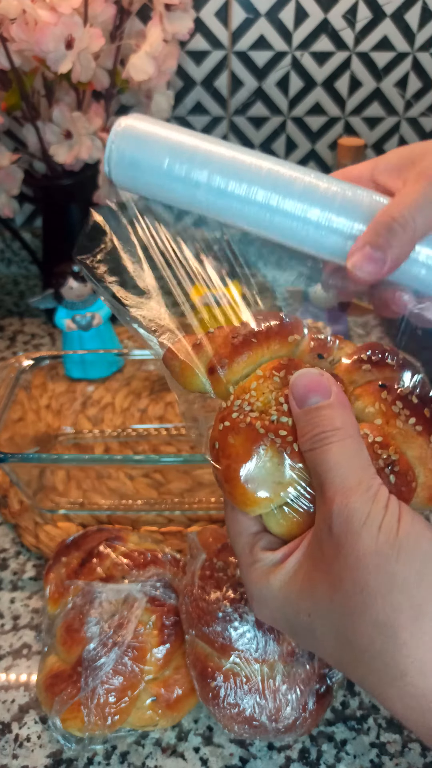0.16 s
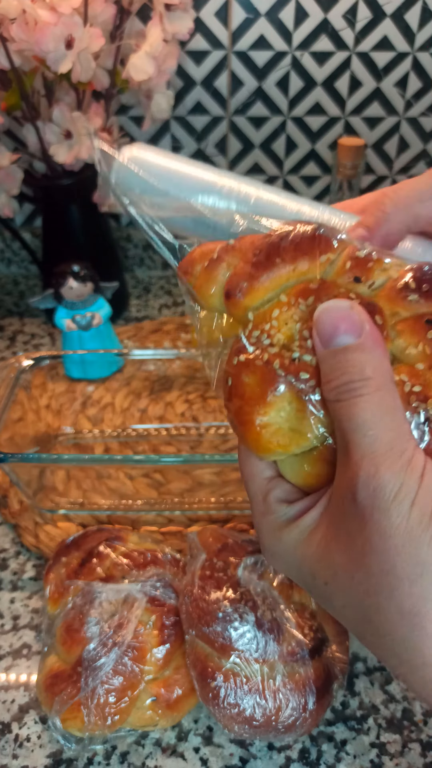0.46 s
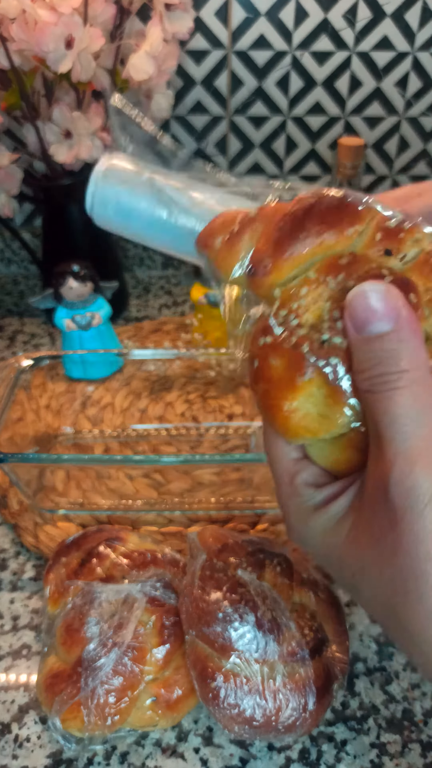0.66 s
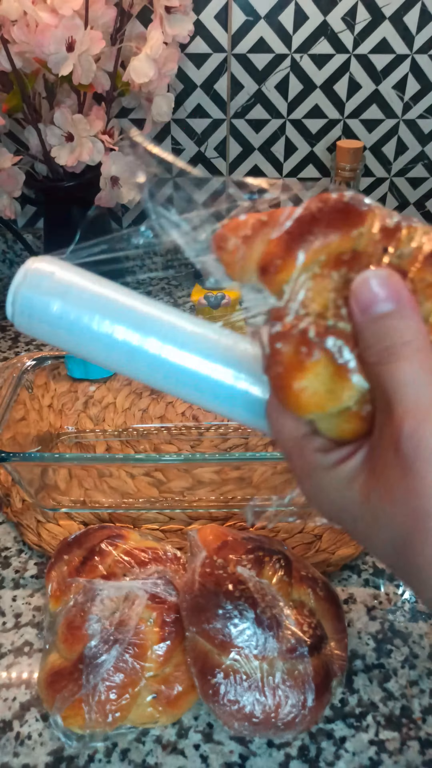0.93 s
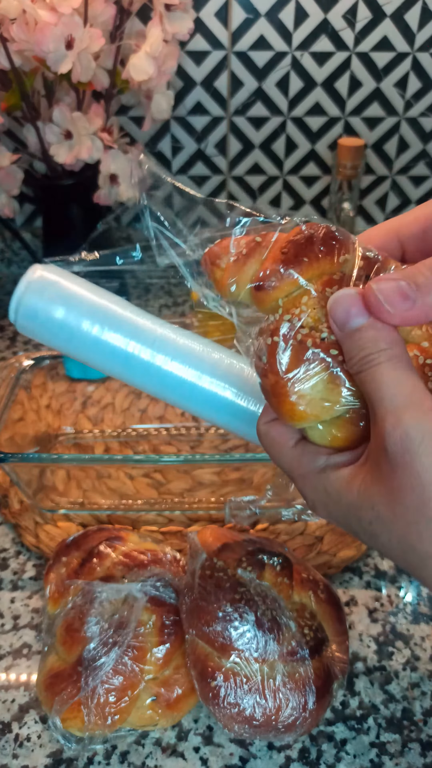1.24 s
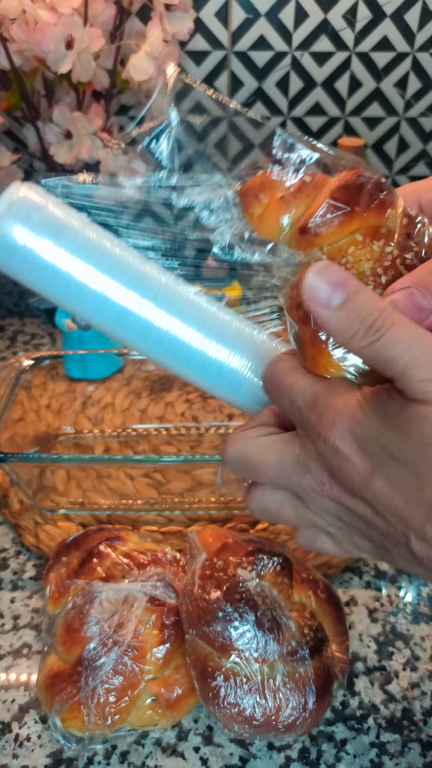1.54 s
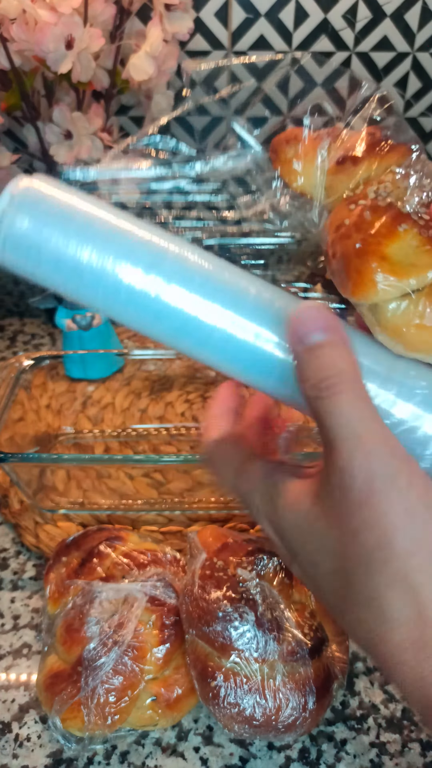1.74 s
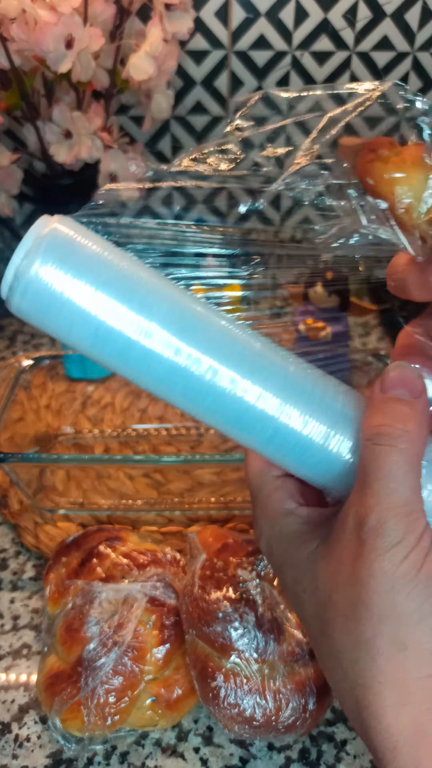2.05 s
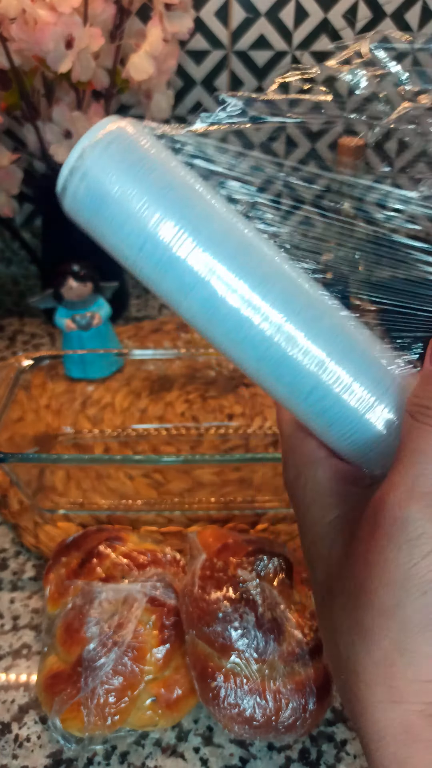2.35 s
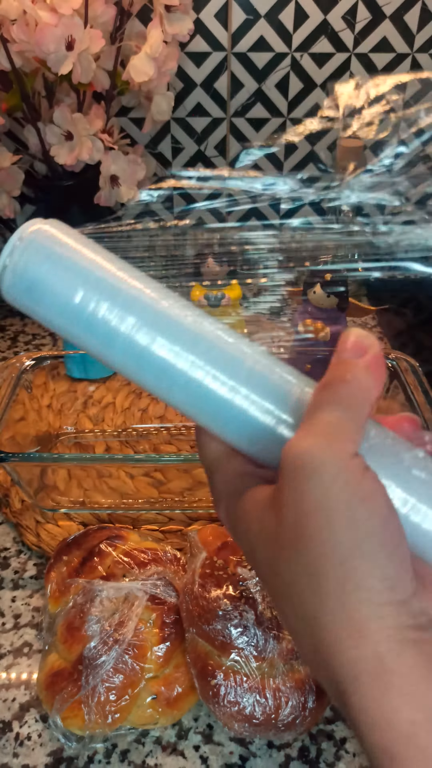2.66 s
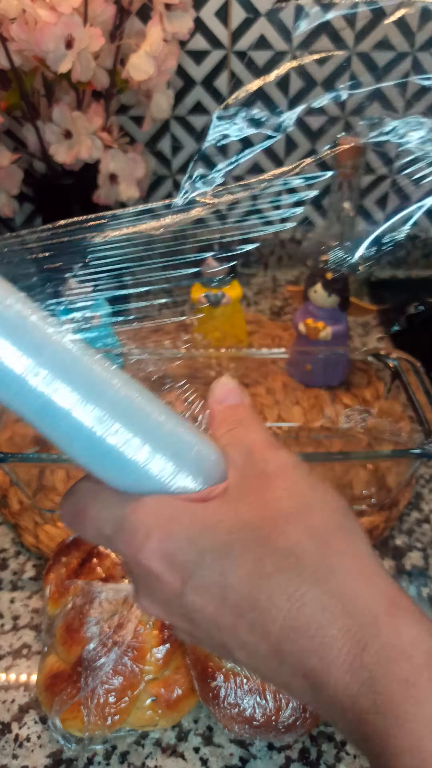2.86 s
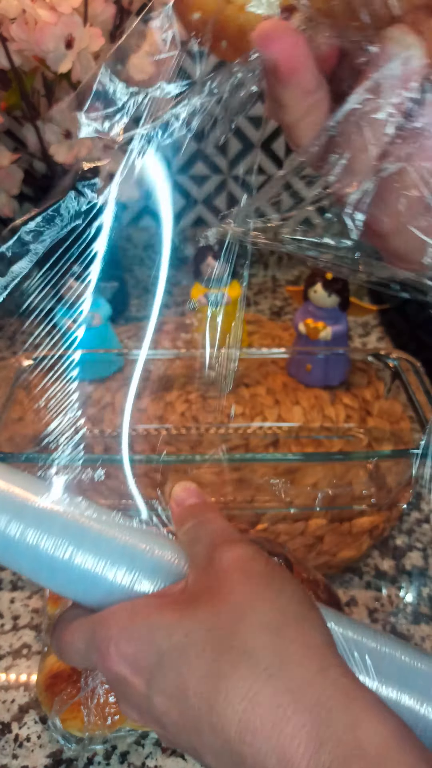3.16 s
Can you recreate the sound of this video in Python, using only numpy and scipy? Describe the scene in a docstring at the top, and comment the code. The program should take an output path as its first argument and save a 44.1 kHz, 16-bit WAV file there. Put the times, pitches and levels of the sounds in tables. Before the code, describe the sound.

Cling film is tugged from a roll close to the microphone: strong rasps early, faint crinkles and a tiny squeak in the middle, then a dense burst of crackles and snaps in a small, reverberant kitchen.

```python
"""A short rasp of cling film fades first; more tugs follow as film leaves its roll and is wound round a loaf.
The film peels in tiny slips, from a slow rattle to a fast rasp; each slip cracks, rings the taut sheet
and drums on the roll. Slack film crinkles in random ticks, over the hush of a small kitchen.
Stuck folds let go with single snaps, sliding film squeaks, and the roll knocks when the film catches.
Echoes made from fading noise, plus a few ringing low notes, give the close tiled room."""
import sys
import numpy as np
from scipy import signal
from scipy.fft import rfft, irfft, next_fast_len
from scipy.io import wavfile
from scipy.ndimage import uniform_filter1d, minimum_filter1d

SR = 44100
rng = np.random.default_rng(int(sys.argv[2]) if len(sys.argv) > 2 else 0)


def master_out(mix):
    """Clip the mix to full scale and print it as 16-bit PCM to the path in sys.argv[1]."""
    frames = np.transpose(np.atleast_2d(mix))
    ceiling = np.clip(frames, -1, 1)
    pcm = np.round(ceiling * 32767).astype(np.int16)
    wavfile.write(sys.argv[1], SR, pcm)


N = 145530

# Tone of a full crack: pitch_hz [Hz], level_db [dB]
CRACK_TONE = [(100, -47.5), (400, -24.5), (1500, -10), (3000, -11.5), (4300, -1.5), (5500, -2), (7000, 2.5),
              (8300, -5.5), (12000, -8.5), (15500, -16.5)]
# Tone of the middle-pitched rasp: pitch_hz [Hz], level_db [dB]
RASP_TONE = [(100, -37.5), (300, -3.5), (520, 2), (800, 6), (2300, 7.5), (3600, -2), (6000, -3.5),
             (15000, -14)]
# Tone of the drumming roll: pitch_hz [Hz], level_db [dB]
ROLL_TONE = [(30, -44), (90, -15), (160, -2.5), (235, -4), (320, -1.5), (500, -7), (1200, -3.5),
             (5000, -64)]
# Tone of thin ticks, from slack film and small snaps: pitch_hz [Hz], level_db [dB]
TICK_TONE = [(150, -33), (500, -10), (1500, -5.5), (3000, -5), (4400, -3), (5500, -1.5), (7200, 2),
             (8400, -1), (12000, -5.5), (15500, -5)]


def amp(db):
    """Turn decibels into a multiplier."""
    return 10 ** (np.asarray(db) / 20)


def unit(x):
    """Scale to an average (rms) level of 1."""
    return x / np.sqrt(np.mean(x ** 2) + 1e-20)


def along(points, hz):
    """Read between (Hz, value) points, with pitch spaced as the ear hears it (log scale)."""
    point_hz, values = np.transpose(points)
    return np.interp(np.log(hz + 1), np.log(point_hz + 1), values)


def coloured(x, points, keep_power=True):
    """Give a sound the tone drawn by (Hz, dB) points, without smearing it ahead of its start."""
    m = 2 * next_fast_len(N)
    gain = amp(along(points, np.fft.rfftfreq(m, 1 / SR)))
    if keep_power:
        gain = unit(gain)
    # Folding the cepstrum forward gives a minimum-phase filter, which reacts at once.
    cepstrum = irfft(np.log(gain))
    cepstrum[1:m // 2] *= 2
    cepstrum[m // 2 + 1:] = 0
    return irfft(rfft(x, m) * np.exp(rfft(cepstrum)))[:N]


def cracks(times, sizes, decay_s, fuzz):
    """Each sudden release is a sharp step with a short noisy tail; its energy goes as size squared."""
    at = np.round(np.asarray(times) * SR).astype(int)
    inside = (at >= 0) & (at < N)
    spikes = np.bincount(at[inside], sizes[inside], N)
    keep = np.exp(-2 / (decay_s * SR))  # energy kept from one sample to the next
    energy = signal.lfilter([1 - keep], [1, -keep], spikes ** 2 + 1e-20)
    tail = np.sqrt(energy) * rng.standard_normal(N)
    return (spikes + fuzz * tail) / np.hypot(1, fuzz)


def sheet(x, pitch_hz):
    """Taut film rings in several modes, gliding with its free length and wandering with its tension."""
    # Sheet modes: pitch_ratio [times the base pitch], level_db [dB]
    mode_list = [(1.002, 1.5), (1.45, -7.5), (2.05, -3), (2.8, -3.5)]
    width_hz, wander_share = 39, 0.046  # width of each mode; wander as a share of the pitch
    knots = rng.standard_normal(40)
    wander = np.interp(np.arange(len(x)) / SR * 80, np.arange(len(knots)), knots)  # 80 knots a second
    phase = 2 * np.pi * np.cumsum(pitch_hz * (1 + wander_share * wander)) / SR
    keep = np.exp(-np.pi * width_hz / SR)
    out = np.zeros(len(x))
    for ratio, db in mode_list:
        turn = np.exp(1j * ratio * phase)
        ringing = turn * signal.lfilter([1], [1, -keep], x / turn)
        out += amp(db) * ringing.imag
    # The ringing gets the same energy as the slips that drive it.
    return out * np.linalg.norm(x) / (np.linalg.norm(out) + 1e-12)


def peeling():
    """Film sticks and slips off the roll; every slip cracks, rasps, rings the sheet and drums on the roll."""
    # Tugs: start_s [s], end_s [s], first_level_db, last_level_db [dB before tone shaping],
    # first_rate, last_rate [slips per s], uneven [0-1], first_pitch_hz, last_pitch_hz [sheet base pitch, Hz],
    # ring_db, rasp_db, roll_db [dB relative to the slips]
    tugs = [(-.03, 0.029, -36.5, -46, 580, 403, 0.12, 790, 661, -5, -5, -3),
            (.14, 0.212, -60.5, -32, 513, 458, 0.09, 1155, 703, -7.5, -7, -12.5),
            (0.208, .245, -25.5, -21.5, 600, 665, 0.17, 580, 565, -17, -7, -28),
            (0.248, 0.299, -24.5, -21.5, 860, 800, .5, 890, 816, -10.5, -7.5, -21),
            (0.3, .318, -35, -23.5, 630, 730, 0.5, 780, 785, -13, -0.5, -22),
            (0.321, .356, -15, -28.5, 805, 628, 0.48, 618, 574, -11, -4.5, -40),
            (0.571, 0.617, -42.5, -41.5, 440, 650, 0.4, 542, 476, -9, -6, -12),
            (0.613, 0.638, -40, -33, 755, 700, 0.35, 694, 734, -12, -0.5, -26),
            (0.647, 0.674, -38, -36, 520, 460, .35, 737, 719, -4, -1, -9),
            (.925, 0.976, -54, -40, 860, 610, 0.32, 1790, 1560, -24, -30, -21),
            (1.016, 1.04, -52, -44.5, 730, 700, .5, 710, 694, -16, -9.5, -10),
            (1.212, 1.255, -49.5, -49.5, 395, 420, 0.99, 530, 493, -19, -7, -7.5),
            (1.945, 2, -44.5, -61.5, 690, 630, 0.46, 810, 810, -11, -3, -6.5),
            (1.999, 2.035, -24.5, -23.5, 650, 650, 0.68, 790, 810, -20, -1, -12),
            (2.039, 2.088, -32.5, -35.5, 630, 482, .5, 235, 238, -6.5, 0.5, -8.5),
            (2.291, 2.38, -47.5, -49.5, 720, 760, 0.69, 910, 910, -22, -14, -17),
            (2.424, 2.452, -55, -52, 540, 550, 0.66, 700, 604, -8.5, -7, -8),
            (2.546, 2.587, -28, -31, 590, 470, .45, 920, 1030, -37, -4.5, -11),
            (2.594, 2.624, -40, -37, 570, 550, .5, 730, 708, -11, -5.5, -12),
            (2.644, 2.745, -34.5, -38.5, 543, 500, 0.48, 474, 422, -15, -6.5, -7.5),
            (2.785, 2.824, -31.5, -34.5, 483, 500, 0.65, 230, 232, -3.5, -10, -5),
            (2.806, 2.853, -24, -25.5, 557, 360, 0.17, 529, 746, -6, -14.5, -29),
            (2.861, 2.886, -33, -33.5, 350, 410, .6, 713, 662, -5, -2, -10.5),
            (2.924, 2.972, -25.5, -28, 376, 280, 0.15, 642, 715, -11.5, -11.5, -16),
            (2.971, 2.996, -37.5, -49, 304, 184, 0.76, 680, 634, -19, 5.5, 4),
            (3.18, 3.226, -39.5, -45.5, 424, 413, 0.7, 414, 418, -16, -7.5, -8)]
    attack_s, release_s = 0.0026, 0.0046
    size_spread_db = 7.5  # scaled by each tug's unevenness
    slip_decay_s, slip_fuzz = 0.0009, 1.31  # tail length; tail strength before unevenness scales it
    t = np.arange(N) / SR
    crack, rasp, drum, ring = np.zeros((4, N))
    for start, end, db0, db1, rate0, rate1, uneven, hz0, hz1, ring_db, rasp_db, roll_db in tugs:
        span = [start, end]
        chance = rng.standard_normal((200, 2))
        # Count slips along the tug, then push each one early or late by chance.
        slip_count = np.cumsum(np.interp(t, span, [rate0, rate1]) * (t >= start)) / SR
        marks = np.arange(len(chance)) + .5 + .5 * uneven * chance[:, 0]
        times = np.interp(np.abs(marks) + 1e-6, slip_count, t)

        rise = np.clip((times - start) / attack_s, 0, 1)
        fall = np.exp(-np.maximum(times - end, 0) / release_s)
        shape = rise * fall
        scatter = amp(size_spread_db * uneven * np.clip(chance[:, 1], -2, 2))
        # Uneven sizes must not change the tug's overall energy.
        scatter /= np.sqrt(np.sum((scatter * shape) ** 2) / (np.sum(shape ** 2) + 1e-12)) + 1e-12
        level = amp(np.interp(times, span, [db0, db1]))
        rate = np.interp(times, span, [rate0, rate1])
        sizes = scatter * shape * level * np.sqrt(SR / rate)  # fewer slips are each larger

        slips = cracks(times, sizes, slip_decay_s, slip_fuzz * np.sqrt(abs(uneven)))
        slips -= uniform_filter1d(slips, size=400)  # take out slow drift
        crack += slips
        rasp += amp(rasp_db) * slips
        drum += amp(roll_db) * slips
        live = (t >= start) & (t < end + .1)
        ring[live] += amp(ring_db) * sheet(slips[live], np.interp(t[live], span, [hz0, hz1]))
    late_rasp = np.roll(rasp, 9)  # about 0.2 ms after the crack
    return coloured(crack, CRACK_TONE) + coloured(late_rasp, RASP_TONE) + coloured(drum, ROLL_TONE) + ring


def crinkle():
    """Slack film creases under the fingers in faint, bright random ticks."""
    # Crinkle loudness: time_s [s], level_db [dB before tone shaping]
    loudness = [(0, -67), (.55, -66), (.8, -64), (.9, -59), (1.1, -60), (1.18, -50), (1.36, -56),
                (1.47, -59), (1.68, -54.5), (1.8, -66), (1.95, -50.5), (2.22, -51), (2.35, -58),
                (2.5, -53.5), (3.1, -51.5), (3.3, -46)]
    ticks_per_s, spread_db = 800, 4
    chance = rng.random((int(ticks_per_s * N / SR), 2))
    times = chance[:, 0] * N / SR
    scatter = unit(amp(spread_db * np.minimum(-np.log(chance[:, 1]), 3.5)))  # mostly small, a few large
    sizes = scatter * np.sqrt(SR / ticks_per_s)
    level = amp(np.interp(times, *np.transpose(loudness)))
    return coloured(cracks(times, sizes * level, decay_s=.0018, fuzz=3), TICK_TONE)


def hush():
    """Steady noise, strongest in the bass, stands for the quiet kitchen."""
    # Tone of the hush: pitch_hz [Hz], level_db [dB]
    hush_tone = [(20, -42), (50, -18), (82, 6.5), (120, -3.5), (230, -1.5), (340, -6), (500, -6),
                 (900, -16), (2500, -27), (7000, -27), (16000, -47.5)]
    return amp(-57.5) * coloured(rng.standard_normal(N), hush_tone)


def kitchen(x):
    """Quick early echoes and a short tail from fading noise; crossfading patterns avoid a steady comb."""
    # Time for the tail to fade by 60 dB: pitch_hz [Hz], fade_s [s]
    fade_times = [(150, 0.42), (450, 0.46), (1000, 0.36), (3000, 0.31), (7000, 0.22), (15000, 0.11)]
    # Tone of all echoes: pitch_hz [Hz], level_db [dB]
    echo_tone = [(100, -0.5), (600, 0.5), (2500, -2.5), (7000, 1.5), (15000, 4)]
    tail_db, early_db, early_decay_s = -10.5, -8, 0.0028  # levels before the echo tone
    t, out = np.arange(N) / SR, np.zeros(N)
    places = np.linspace(0, N / SR, num=21)  # times at which a new echo pattern is strongest
    for place in places:
        hz, age, z = signal.stft(rng.standard_normal(SR // 2), SR, nperseg=256)
        fading = np.exp(-np.log(1000) * age / along(fade_times, hz)[:, None])
        tail = signal.istft(z * fading, SR, nperseg=256)[1]
        lag = np.arange(len(tail)) / SR
        tail = tail * np.minimum(lag / 0.018, 1)  # the tail builds up over 18 ms
        early = rng.standard_normal(len(lag)) * np.exp(-lag / early_decay_s) * (lag > .001)
        answer = amp(tail_db) * tail / np.linalg.norm(tail)
        answer += amp(early_db) * early / np.linalg.norm(early)
        # Neighbouring echo patterns crossfade.
        share = np.sqrt(np.maximum(1 - np.abs(t - place) / places[1], 0))
        out += signal.fftconvolve(x * share, answer)[:N]
    return coloured(out, echo_tone, keep_power=False)


def standing_waves(x):
    """A few low notes hang on between the tiled walls, each from a narrow resonant filter."""
    # Room notes: pitch_hz [Hz], width_hz [Hz], level_db [dB]
    room_notes = [(234.2, 6.1, -4.5), (274, 10, -2.5), (540, 18, 3.5)]
    return sum(amp(db) * signal.lfilter(*signal.iirpeak(hz, hz / width, SR), x)
               for hz, width, db in room_notes)


def snaps():
    """Single stuck folds tear free; the small ones sound thinner and brighter."""
    # Snaps: time_s [s], level_db [dB before the boost and tone shaping]
    snap_list = [(0.813, -37), (1.2171, -27), (1.3876, -25), (1.6813, -34), (1.71, -33.5), (1.9956, -11),
                 (1.998, -16), (2.006, -18), (2.013, -27), (2.0365, -15), (2.043, -10.5), (2.0586, -12),
                 (2.068, -16), (2.0832, -16.5), (2.098, -8.5), (2.1948, -26), (2.277, -24.5),
                 (2.294, -20.5), (2.3096, -16.5), (2.321, -24), (2.343, -24), (2.345, -18.5),
                 (2.361, -19.5), (2.422, -25), (2.429, -25.5), (2.438, -20), (2.444, -22), (2.472, -28.5),
                 (2.501, -54), (2.5398, -17), (2.555, -7), (2.568, -15), (2.58, -15), (2.632, -8),
                 (2.6425, -22), (2.651, -13.5), (2.669, -13), (2.691, -17.5), (2.7007, -12.5),
                 (2.73, -13.5), (2.739, -24), (2.765, -7), (2.7865, -13.5), (2.808, -12), (2.87, -12),
                 (2.9811, -18), (2.9903, -12.5), (3.0093, -16), (3.0215, -12), (3.186, -26)]
    boost_db, decay_s, fuzz = 7.5, 0.0011, 2.66  # added level; tail length; tail strength
    small_db, big_db = -27.5, -12.5  # table levels: a thin tick below the first, a full crack above the second
    times, db = np.transpose(snap_list)
    big = np.clip((db - small_db) / (big_db - small_db), 0, 1)
    sizes = amp(db + boost_db)
    full = cracks(times, sizes * np.sqrt(big), decay_s, fuzz)
    thin = cracks(times, sizes * np.sqrt(1 - big), decay_s, fuzz)
    out = coloured(full, CRACK_TONE)
    out += amp(-8.5) * coloured(full, RASP_TONE)
    out += amp(-11) * coloured(full, ROLL_TONE)
    return out + coloured(thin, TICK_TONE)


def squeak():
    """Film sliding on film slips fast enough to give a short, rough, dipping note."""
    # Squeak path: time_s [s], pitch_hz [base pitch before wavering, Hz], level_db [dB]
    path = [(.925, 2156, -70), (.94, 1771, -52), (0.956, 1557, -53), (0.966, 1534, -44.5),
            (.974, 1660, -43.5), (.982, 1880, -72)]
    # Overtones: multiple [times the base pitch], level_db [dB relative to each other]
    overtones = [(1, -6), (2, -8), (3, -3), (4, 1), (5, 5.5)]
    waver_share = .025  # share of the pitch
    t = np.arange(N) / SR
    times, hz, db = np.transpose(path)
    waver = unit(uniform_filter1d(rng.standard_normal(N), size=40))
    phase = 2 * np.pi * np.cumsum(np.interp(t, times, hz) * (1 + waver_share * waver)) / SR
    note = sum(amp(level) * np.sin(round(k) * phase) for k, level in overtones)
    sounding = (t > times[0]) * (t < times[-1])
    return unit(note) * amp(np.interp(t, times, db)) * sounding


def jerks():
    """The cardboard roll gives a hollow knock of fading notes when the film catches."""
    # Knocks: time_s [s], level_db [dB before each note's own level]
    knocks = [(2.1, -28), (2.555, -33.5), (2.767, -23.5), (3.19, -39)]
    # Notes of the roll: pitch_hz [Hz], level_db [dB], fade_s [s to fade by 60 dB]
    roll_notes = [(162, -17, 0.026), (242.6, -4, 0.085), (410, -7, 0.023), (744, -0.5, 0.018)]
    t, out = np.arange(N) / SR, np.zeros(N)
    for start, knock_db in knocks:
        age = np.maximum(t - start, 0)
        for hz, db, fade_s in roll_notes:
            fading = np.exp(-np.log(1000) * age / fade_s)
            out += amp(knock_db + db) * fading * np.sin(2 * np.pi * hz * age)
    return out


def scene():
    """Add film and roll, their room sound and the kitchen's hush."""
    film = peeling() + snaps() + jerks() + squeak() + crinkle()
    room = kitchen(film) + standing_waves(film)
    return (film + room + hush())[None]


def record(dry):
    """Cut the low bass, shape two dips in the treble, round the peaks and remove the very top."""
    # Treble dips: pitch_hz [Hz], level_db [dB]
    treble_dips = [(4650, 0), (4850, -7), (6000, -7), (6250, 0), (8450, 0), (8650, -16), (10500, -23),
                   (11450, -20), (11680, 0)]
    low_cut_hz, top_hz, ceiling_db = 91, 15850, -12
    m = 2 * next_fast_len(N)
    hz = np.fft.rfftfreq(m, 1 / SR)
    x = signal.sosfilt(signal.butter(2, low_cut_hz, "high", fs=SR, output="sos"), dry)
    x = irfft(rfft(x, m) * amp(along(treble_dips, hz)), m)[:, :N]
    # Turn the level down around each peak that passes the ceiling.
    needed_gain = np.minimum(1, amp(ceiling_db) / (np.abs(x) + 1e-9))
    x = x * uniform_filter1d(minimum_filter1d(needed_gain, size=90), size=90)
    return irfft(rfft(x, m) * (hz < top_hz), m)[:, :N]


dry = scene()
out = record(dry)
master_out(out)
```